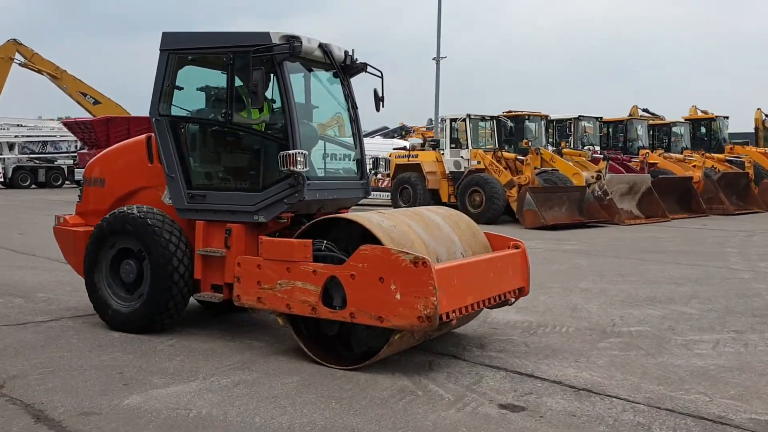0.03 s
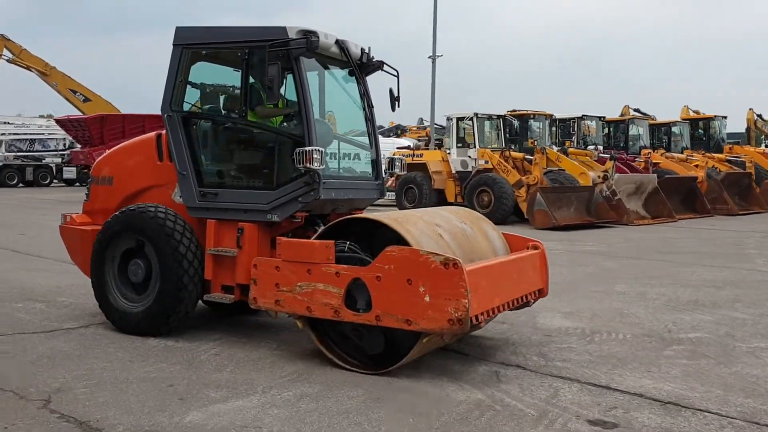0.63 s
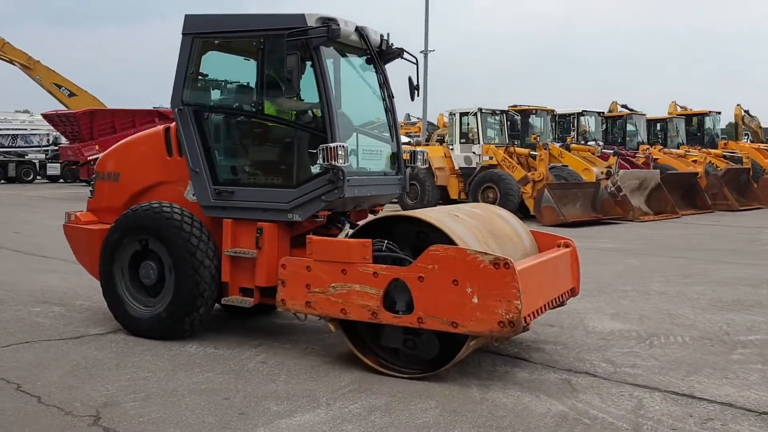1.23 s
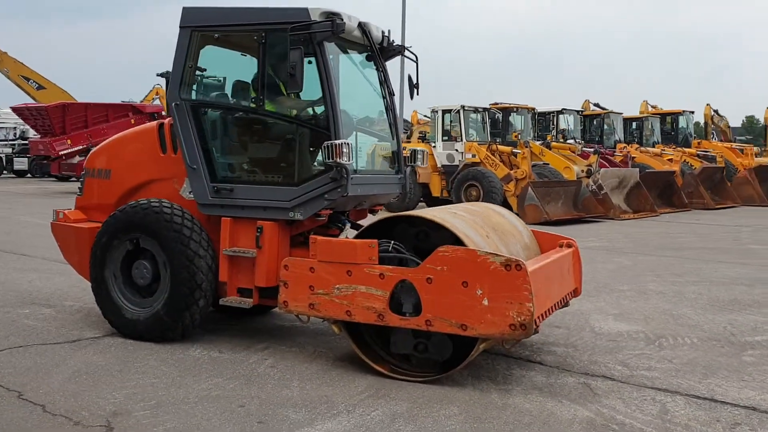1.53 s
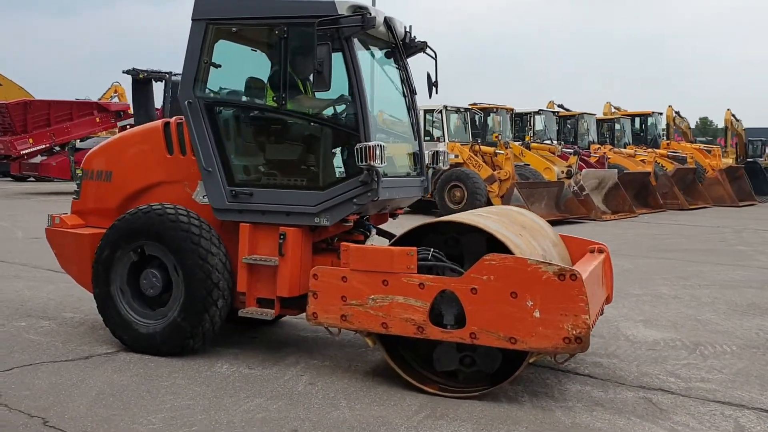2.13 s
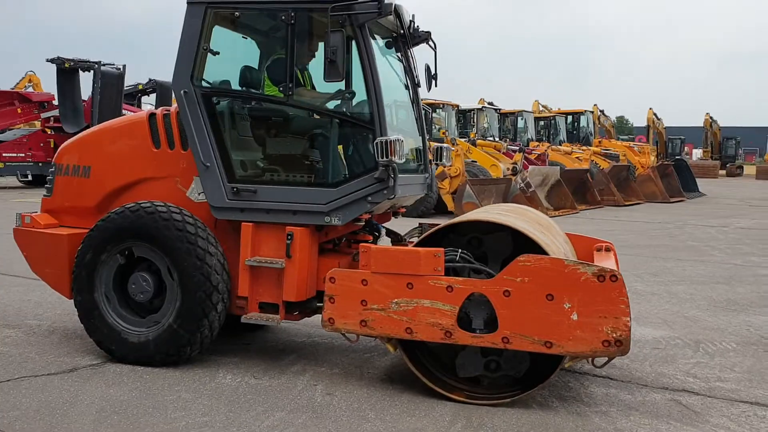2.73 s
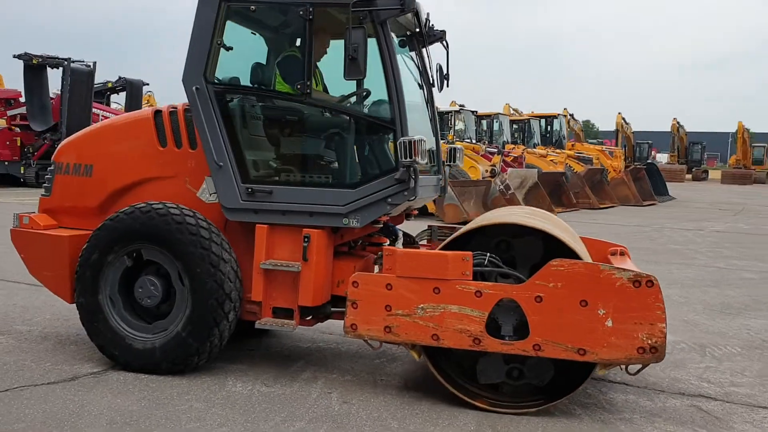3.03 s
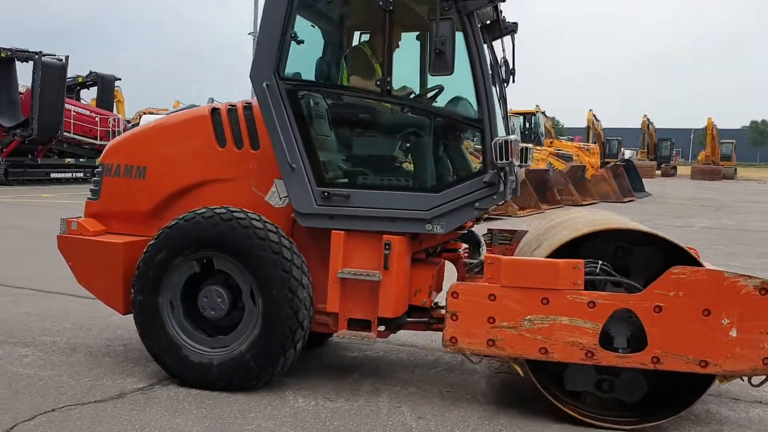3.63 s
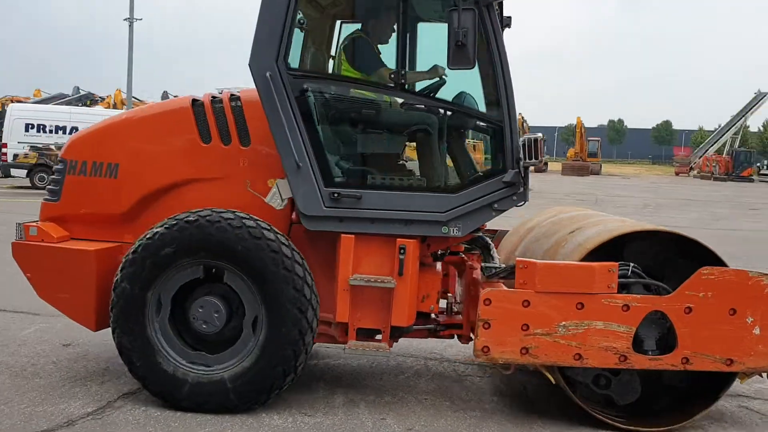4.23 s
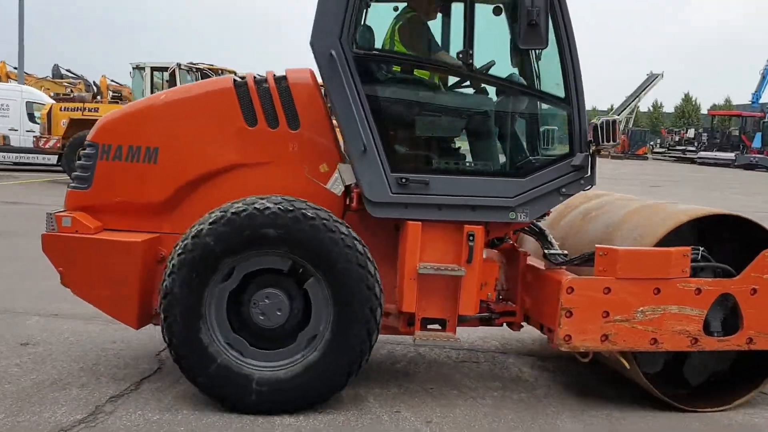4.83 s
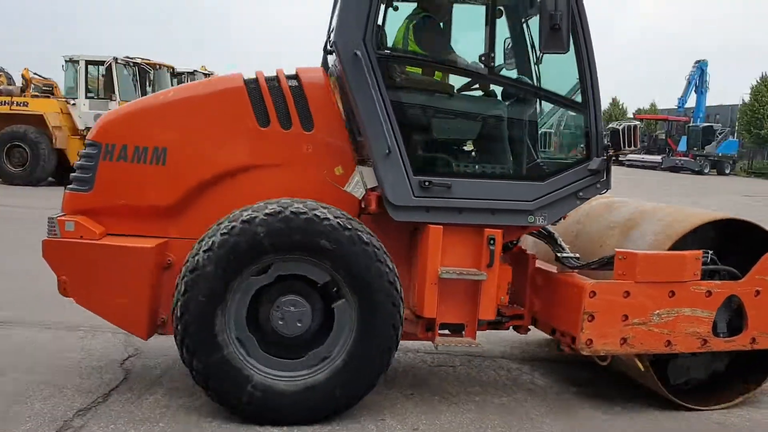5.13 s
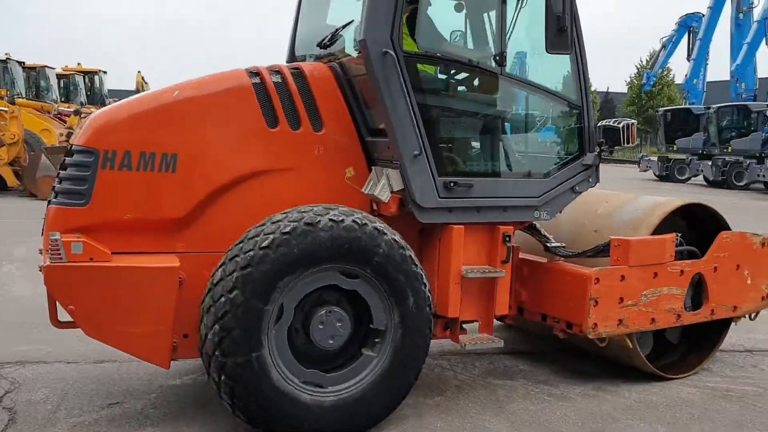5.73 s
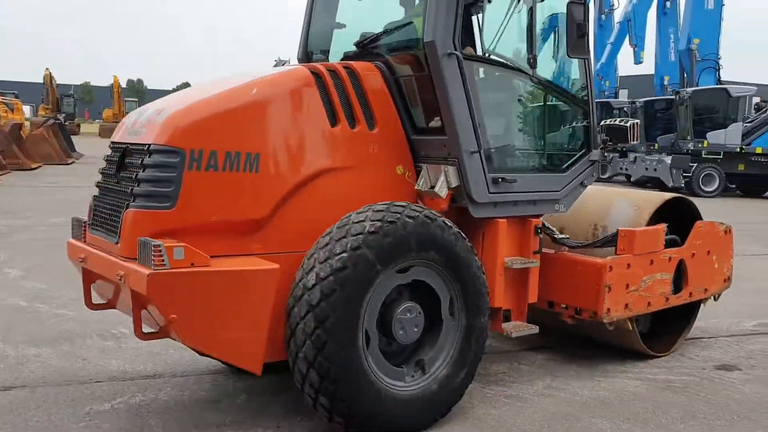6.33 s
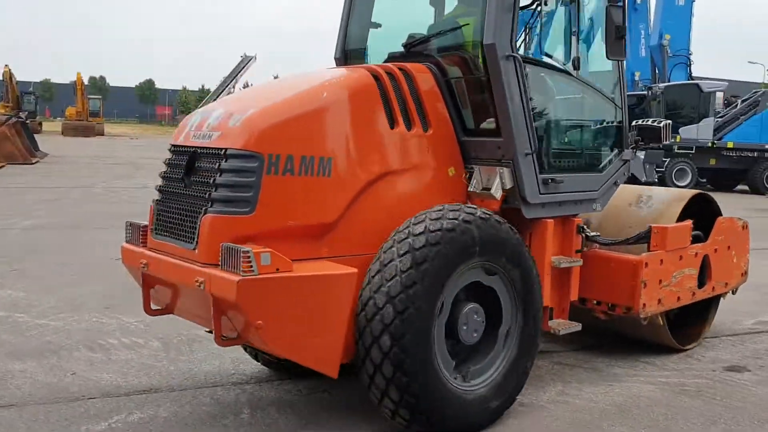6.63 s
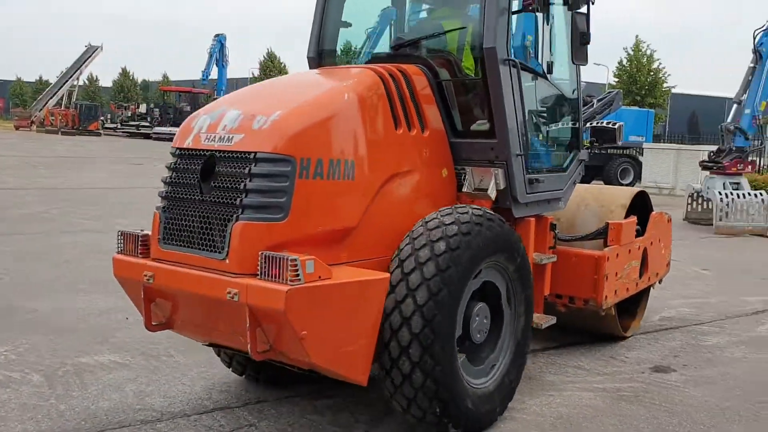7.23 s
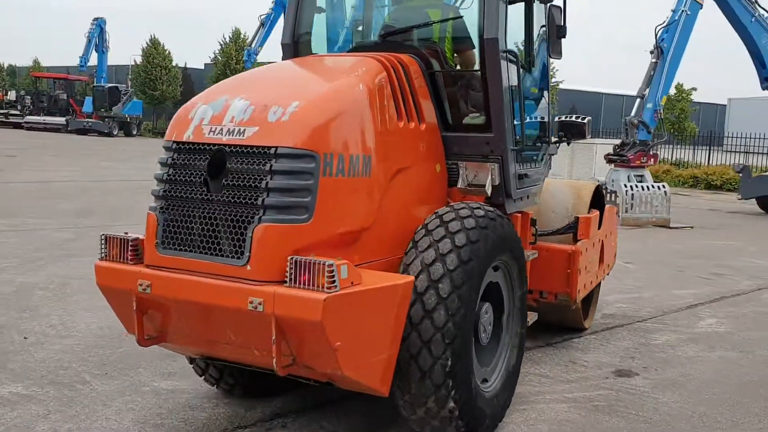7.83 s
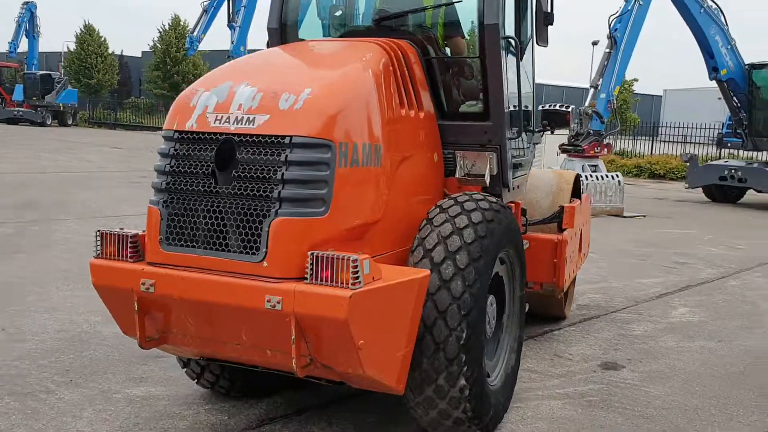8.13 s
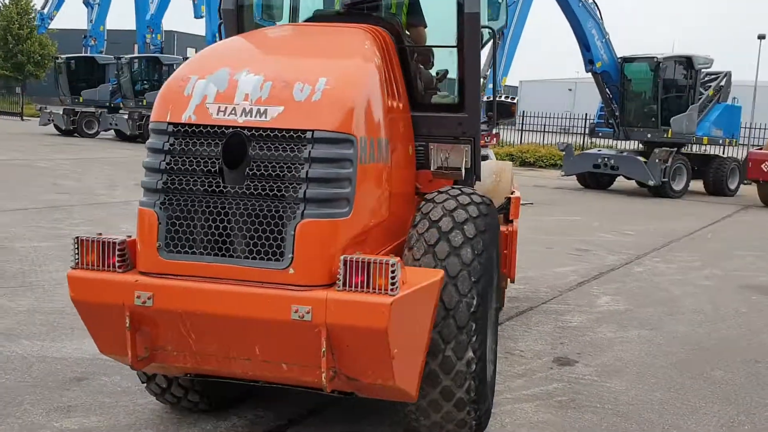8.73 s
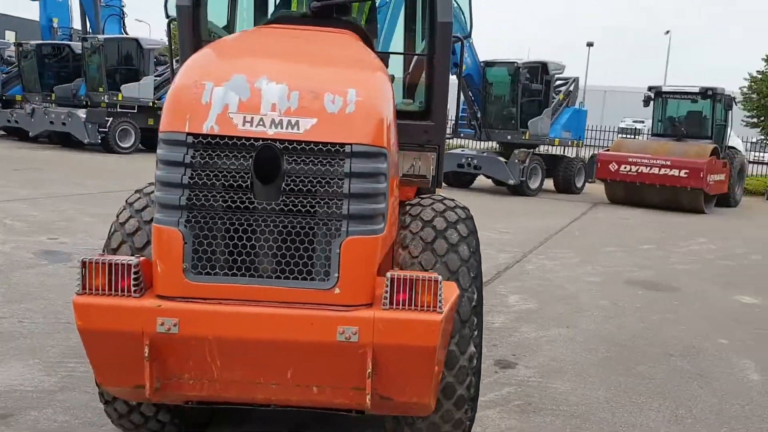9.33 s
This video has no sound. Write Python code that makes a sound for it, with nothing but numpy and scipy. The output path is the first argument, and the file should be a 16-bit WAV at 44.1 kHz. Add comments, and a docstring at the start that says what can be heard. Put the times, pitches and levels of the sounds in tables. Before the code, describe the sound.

A road roller's diesel engine idles outdoors with a low drone, a hollow knock and the light clink of a loose part. At first, grit grinds and squeaks under the steel drum. Midway, a few stones crunch, and the engine sags under load, then recovers. As the microphone walks from the side to the rear grille, the knocking, ticking and fan rush grow. Wind briefly buffets the microphone near the end.

```python
"""A low diesel drone is heard first, with grit grinding under a road roller's steel drum.
The four-cylinder engine idles at about 1000 rpm, sagging under load and recovering; its firings set
the exhaust's pitch and the rhythm of a hollow knock and of a loose part that clinks at the side.
Each source has its own directivity, so as the microphone walks from the side to the rear grille the
drone shifts and combustion knock and fan rush grow. Stones crunch, and gusts buffet the microphone."""
import sys
import numpy as np
from scipy.fft import rfft, irfft, next_fast_len
from scipy.io import wavfile
from scipy.ndimage import map_coordinates

SR = 44100
rng = np.random.default_rng(int(sys.argv[2]) if len(sys.argv) > 2 else 0)


def unload_wav(signal):
    """Save mono or channel-first audio to the path in sys.argv[1] as 16-bit WAV at rate SR, clipped to [-1, 1]."""
    wavfile.write(
        sys.argv[1],
        SR,
        np.round(np.clip(np.atleast_2d(signal).T, -1, 1) * 32767).astype(np.int16),
    )


N = 413216

# The walk. Each row: time in seconds, bearing in degrees from the front, nearness gain in dB.
WALK = [(0, 30, 2), (1.2, 61, 0), (3.3, 90, 1), (5.3, 114.5, 2.2), (6.1, 120.6, 3), (7.2, 123.6, 2.4),
        (7.8, 150.5, 1.5), (8.7, 162, 3), (9.37, 146, 1.5)]
GRILLE_DEG = (57.6, 176.6)  # the rear grille starts to open to the ear, and is fully open
# Engine speed. Each row: time in seconds, firings per second.
FIRING_RATE = [(0.0, 36.91), (0.2, 34.14), (0.6, 33.7), (1.0, 33.99), (1.4, 33.64), (2.3, 33.75),
               (3.0, 33.36), (3.8, 32.74), (4.2, 32.85), (4.5, 31.76), (4.8, 31.81), (5.6, 31.05),
               (6.25, 30.77), (6.5, 32.62), (6.8, 33.33), (7.17, 35.76), (7.48, 33.38), (9.37, 33.04)]
IDLE_HZ, LABOUR_HZ = 33.14, 31.59  # firing rates running free and fully loaded
# Knock strength. Each entry: relative level in dB of one cylinder, in firing order.
CYLINDERS = [5.9, 6.7, 0.64, 2.6]

# Noise spectra. Each row: frequency in Hz, relative spectral density in dB.
GRIT_SPECTRUM = [(2000, -27), (5000, -6), (7900, -1.5), (9500, -16.5), (12000, -8.5), (15700, -27)]
THUD_SPECTRUM = [(300, -15), (700, -1), (1400, 1), (2400, -1.5), (5000, -20), (10000, -38)]
GUST_SPECTRUM = [(20, -17), (60, 4.5), (130, -1.5), (250, -4.5), (450, -16.5), (800, -21), (2000, -59)]
VENT_SPECTRUM = [(150, -30), (250, 2.5), (340, -4.5), (450, -2), (570, -11), (720, 0), (930, -6),
                 (1300, -27), (2500, -43.5)]
BOOM_SPECTRUM = [(10, -7), (25, -1), (40, 3), (80, 5), (150, 2.5), (210, -2.5), (300, -6), (380, -12.5),
                 (600, -49)]
PANEL_SPECTRUM = [(200, -29.5), (350, -8), (480, -2), (570, -1), (680, -3), (800, -5.5), (1000, -7.5),
                  (1250, -11), (2000, -51)]
CLATTER_SPECTRUM = [(600, -34.5), (1000, -6.5), (1300, 0), (1700, 1), (2000, -4), (2500, -7), (3200, -20),
                    (5000, -32.5)]
RUSH_SPECTRUM = [(1800, -20), (2800, 6), (3500, 2), (4500, 2), (5200, -3), (6000, -5.5), (7500, -5),
                 (8600, -22.5), (10300, -17), (13500, -18.5), (15700, -39)]
FAN_SPECTRUM = [(150, -28.5), (230, -3.5), (300, -0.5), (370, -6.5), (460, -23.5), (800, -36)]

# Resonances. Each row: frequency in Hz, bandwidth in Hz, relative level in dB.
DRUM_MODES = [(520, 110, 4), (964, 46, 7), (1380, 160, -8.5), (1820, 220, -0.5), (2100, 130, 1),
              (2250, 70, -2), (2640, 19, -0.5), (4040, 140, -7.5), (5330, 120, -18), (7900, 3000, -25.5),
              (12800, 2600, -27.5)]
CRACK_MODES = [(2500, 1700, -7), (4600, 2400, 4.5), (9400, 900, 3), (11400, 1900, -1.5)]
SHELL_MODES = [(3020, 70, -5), (4060, 120, -3), (4780, 250, -5.5), (5430, 120, -5), (9200, 120, -13.5)]  # the drum after a stone bursts
SQUEAK_MODES = [(2390, 50, 3), (2600, 79, -2.5), (4030, 63, -14), (5080, 90, -3.5), (5480, 140, -12)]  # the drum as grit skids under it
FRAME_MODES = [(610, 64, 4.5), (678, 45, 10), (1300, 110, -6), (1470, 55, -9.5), (1740, 55, -5),
               (2140, 150, -6), (2960, 75, -14.5), (4430, 350, -19.5)]
INJECTOR_MODES = [(4080, 180, -4.5), (4500, 250, 1.5), (6970, 360, -7), (7850, 250, -9.5),
                  (10400, 220, -17), (11900, 1700, -19)]  # injectors and valve gear
ZING_MODES = [(6300, 92, 3), (6650, 250, -10), (7200, 270, -12)]  # a thin ring on top of the ticks
BLOCK_MODES = [(1315, 92, -2.5), (1496, 76, -0.5), (1573, 63, 0.5), (1764, 67, -3), (2205, 52, -5.5),
               (2695, 130, -14), (4220, 470, -16), (4425, 70, -12), (7400, 400, -26)]
COVER_MODES = [(2610, 36, 3.5), (2805, 130, 0), (3015, 25, 5), (3250, 16, 2), (3780, 240, -6),
               (4550, 29, 1.5), (6390, 95, -7.5), (7290, 76, -8), (7800, 160, -18.5), (9300, 30, -17),
               (10240, 120, -8)]

# Partials of struck parts. Each row: frequency in Hz, relative level in dB.
CLONK_PARTIALS = [(908, -2), (992, -14), (823, -9.5)]
CLINK_PARTIALS = [(1744, 2), (1508, -3.5)]
PING_PARTIALS = [(1512, -1), (1765, -15)]

# Bell-shaped swells. Each row: time of the peak in seconds, level in dB, half length in seconds.
GRIT_PATCHES = [(.3, -61.5, 0.6), (4.72, -66, 0.088), (4.95, -62, 0.056), (5.27, -59, .03)]
GUSTS = [(3.44, -40, 0.04), (6.007, -27, 0.043), (8.863, -25, 0.037), (8.986, -19, 0.02),
         (9.034, -20, 0.037)]
VENT_PASS = [(5.75, -43.5, 0.45)]
TICK_FLARES = [(5.08, -60, .1), (5.8, -57, .04), (5.97, -57.5, .03), (6.45, -60, .05), (6.58, -57, .035)]
ZING_SWELLS = [(6.58, -68, 0.23), (7.34, -60, .1), (8.5, -68, 0.51)]

# Levels along the walk. Each row: time in seconds, level in dB.
CLONK_LEVEL = [(0, -63), (1.95, -58), (2.1, -54), (3.2, -55), (3.8, -62), (6, -59.5), (9.37, -54.5)]
PING_LEVEL = [(0, -60.5), (3.3, -55), (5.75, -57), (6.05, -45.5), (6.5, -49.5), (7.3, -51.5), (7.8, -41.5),
              (8.25, -48.5), (8.7, -42.5), (9.37, -51)]
DRONE_LEVEL = [(0.0, -23.5), (0.26, -20), (1.06, -20), (1.58, -17.5), (4.82, -14.5), (6.35, -16.5),
               (6.63, -22), (6.94, -25.5), (8.03, -18), (8.68, -15.5), (8.96, -17), (9.01, -20.5),
               (9.3, -18.5)]

# Scraping grit. Each row: start in seconds, relative level in dB, T60 in seconds, centre in Hz,
# width in octaves.
SCUFFS = [(.07, -61, 0.2, 7700, .24), (.645, -56.5, 0.17, 7200, 0.45), (.72, -60, 0.12, 10500, .4),
          (0.774, -59.5, .3, 7750, .25), (1.124, -59, 0.3, 7450, 0.28), (2.735, -59.5, 0.2, 7460, .22),
          (3.66, -61.5, 0.31, 8130, .5), (3.81, -59.5, 0.23, 9600, .4), (3.935, -59, 0.5, 8000, .35)]
# Crushed stones. Each row: start in seconds, relative crack, thud and ring in dB, T60 in seconds.
STONES = [(4.065, -56.5, -66, -61, .2), (4.092, -44.5, -51, -48.5, .21), (4.275, -53, -41.5, -62, 0.28)]
# Skidding grit. Each row: start in seconds, relative level in dB, T60 in seconds.
SQUEAKS = [(.245, -53.5, 0.54), (.42, -56, 0.43)]
# The sharpest puffs of air. Each row: time in seconds, relative peak in dB.
THUMPS = [(8.9925, -11), (9.0517, -7)]
# Gear tones. Each row: multiple of the firing rate, level on the axis in dB, bearing and half width
# in degrees, level elsewhere in dB.
GEAR_TONES = [(19.5, -50.5, 73, 9, -66), (18.5, -53, 89, 8, -68), (18, -48.5, 113.5, 4.5, -65),
              (17.5, -47, 173, 14, -68)]
# Blows of the loose part. Each row: place in the four-stroke cycle in firings, relative level in dB.
STRIKES = [(3.2, -1), (1.1, 0)]
# The rattle's lobe. In order: level on the axis in dB, bearing and half width in degrees, dB elsewhere.
RATTLE_BEAM = (-50, 75.5, 7, -57.5)
# Machine noise. Each triple: relative level from the front, gain at the grille, gain under load, in dB.
BOOM_LEVEL, PANEL_LEVEL = (-42, 4.8, -3), (-45, 3.9, 0.65)
KNOCK_LEVEL, RUSH_LEVEL = (-49, 7, -.3), (-58.3, 8.2, -0.32)
# Exhaust harmonics. Each row: multiple of the firing rate, level in dB at each of the four QUARTERS_DEG,
# gain under load in dB.
EXHAUST_ORDERS = [(1, -47, -46, -49.5, -39, 2), (3, -41, -40, -31, -28.5, -5.5),
                  (4, -37, -31, -39.5, -38, -6.5), (5, -50.5, -38, -55, -52, -11),
                  (6, -53.5, -53.5, -53, -44, 13), (7, -51.5, -53, -59, -51, -6),
                  (8, -55, -57.5, -44.5, -36.5, 4), (10, -67, -65.5, -66, -50, 8.5)]
QUARTERS_DEG = (45, 90, 135, 180)

# Stereo coherence. Each row: frequency in Hz, correlation of left and right.
COHERENCE = [(30, .95), (70, .93), (130, .8), (300, .88), (640, .85), (1000, .76), (1400, .5), (3000, 0),
             (14000, 0)]
# Imbalance of the microphone's ports. Each row: frequency in Hz, left minus right in dB.
IMBALANCE = [(60, 0.45), (130, 0.5), (280, 0), (550, 0.5), (1200, -4), (2400, -2.5), (5000, -2), (9000, 1),
             (13000, -7.5)]
# The microphone's treble droop. Each row: frequency in Hz, gain in dB.
DROOP = [(13800, 0), (15700, -7.5)]


def amp(db):
    """Decibels to amplitude ratio."""
    return 10 ** (np.asarray(db) / 20)


def unit(x):
    """Normalisation to rms 1."""
    return x / np.sqrt(np.mean(x ** 2) + 1e-20)


def white():
    """Two uncorrelated white noises."""
    return rng.standard_normal((2, N))


def along(points, hz):
    """Interpolation of (Hz, value) points on a logarithmic frequency axis."""
    f, v = np.transpose(points)
    return np.interp(np.log(hz + 1), np.log(f + 1), v)


def curves(rows):
    """Linear interpolation in time: one value per sample for each column after the first."""
    s, *cols = np.transpose(rows)
    return [np.interp(np.arange(N) / SR, s, c) for c in cols]


def wobble(rate):
    """Random modulation: a smooth curve through rate knots a second."""
    knots = np.arange(N) * rate / SR
    steps = np.arange(0, knots[-1] + 1, .125)
    heights = rng.standard_normal(int(knots[-1]) + 4)
    return np.interp(knots, steps, map_coordinates(heights, [steps]))


def swells(rows):
    """Superposition of Gaussian envelopes."""
    t = np.arange(N) / SR
    return sum(amp(db) * np.exp(-.5 * ((t - s) / length) ** 2) for s, db, length in rows)


def impact(age, rise, decay):
    """Envelope of a damped vibration: quick rise, exponential decay."""
    return (1 - np.exp(-age / rise)) * np.exp(-age / decay)


def filtered(x, response):
    """Linear filtering: the spectrum times a frequency response."""
    m = next_fast_len(N + SR // 2)
    return irfft(rfft(x, m) * response(np.fft.rfftfreq(m, 1 / SR)), m)[..., :N]


def colour(points):
    """The frequency response of a (Hz, dB) spectrum."""
    return lambda hz: amp(along(points, hz))


def ringing(modes):
    """Modal superposition: the response of damped resonators of alternating sign."""
    return lambda hz: sum((-1) ** k * amp(db) * 1j * hz * width / (f0 * f0 - hz * hz + 1j * hz * width)
                          for k, (f0, width, db) in enumerate(modes))


def radiated(pair, response=np.ones_like):
    """Partial coherence: two signals become stereo, alike in the bass, unrelated above; mid at rms 1."""
    def spread(hz):
        turn = np.arccos(np.clip(along(COHERENCE, hz), -1, 1)) / 2
        return response(hz) * np.array([np.cos(turn), np.sin(turn)])
    mid, side = filtered(pair, spread)
    return np.array([mid + side, mid - side]) / np.std(mid)


def bearing():
    """The microphone's azimuth in degrees from the front of the machine."""
    return curves(WALK)[0]


def grille():
    """Line of sight: how far the rear grille is open to the microphone, 0-1."""
    return .5 - .5 * np.cos(np.pi * np.interp(bearing(), GRILLE_DEG, (0, 1)))


def beam(axis_db, centre_deg, width_deg, elsewhere_db):
    """Directivity: the level in dB as the microphone crosses a radiation lobe."""
    lobe = np.exp(-.5 * ((bearing() - centre_deg) / width_deg) ** 2)
    return elsewhere_db + (axis_db - elsewhere_db) * lobe


def load():
    """Speed droop gives the load, 0-1: the harder the engine works, the slower it turns."""
    return np.clip((IDLE_HZ - curves(FIRING_RATE)[0]) / (IDLE_HZ - LABOUR_HZ), 0, 1)


def vibration(firings, locked):
    """Cyclic excitation: parts strike in order, so a locked share of the noise power repeats each cycle."""
    size = int(4 * N / firings[-1])
    cycle = rng.standard_normal((2, size))
    place = (firings / 4 % 1 * size).astype(int)
    return np.sqrt(locked) * cycle[:, place] + np.sqrt(1 - locked) * white()


def blows(firings, rise, decay, scatter_db):
    """Impulsive excitation at rms 1, each cylinder with its own strength; times in firing periods."""
    index, age = firings.astype(int), firings % 1
    count = index[-1] + 1
    strength = amp(np.resize(CYLINDERS, count) + scatter_db * rng.standard_normal(count))
    return unit(strength[index] * impact(age, rise, decay))


def struck(count, partials, detune):
    """Free vibration: each whole step of count restarts the partials, slightly off pitch."""
    index = (count - np.floor(count[0])).astype(int)
    out = 0
    for hz, db in partials:
        start = rng.uniform(0, 2 * np.pi, (2, index[-1] + 1))
        pitch_hz = hz * (1 + detune * rng.standard_normal(index[-1] + 1))
        out = out + amp(db) * np.sin(2 * np.pi * np.cumsum(pitch_hz[index]) / SR + start[:, index])
    return out


def overtone(angle, level_db, waver):
    """One harmonic, wavering in level and phase; reflections make it drift between left and right."""
    drift = np.array([[1], [-1]]) * waver * 0.051 * wobble(7.8)
    phase = 0.16 * waver * wobble(18)
    return np.sqrt(2) * amp(level_db + waver * wobble(14)) * np.sin(angle + phase + drift)


def scrape(s, db, t60, response, rise_s=0.0097):
    """A transient of grainy, filtered noise that decays by 60 dB in t60 seconds."""
    out, t = np.zeros((2, N + SR)), np.arange(SR // 2) / SR
    noise = rng.standard_normal((2, len(t)))
    grains = noise * amp(1.4 * np.repeat(rng.standard_normal(len(t)), 64)[:len(t)])
    burst = unit(irfft(rfft(grains) * response(np.fft.rfftfreq(len(t), 1 / SR)), len(t)))
    envelope = amp(db + 8 - 60 * t / t60) * (1 - np.exp(-t / rise_s))
    out[:, round(s * SR):][:, :len(t)] = envelope * burst
    return out[:, :N]


def drum():
    """Rolling noise: grit excites the steel shell's modes, fading as the drum slows to a creep."""
    grind, creep = swells([(0.0066, -45, 0.54)]), amp(-77)
    return (grind + creep) * radiated(white() * amp(0.83 * wobble(250)), ringing(DRUM_MODES))


def grit():
    """Friction: grit scrapes on concrete and squeaks under the shell, and fine patches crackle."""
    def band(centre_hz, octaves):
        return lambda hz: np.exp(-.5 * (np.log2((hz + 1) / centre_hz) / octaves) ** 2)
    scuffs = sum(scrape(s, db, t60, band(*shape)) for s, db, t60, *shape in SCUFFS)
    squeaks = sum(scrape(s, db, t60, ringing(SQUEAK_MODES)) for s, db, t60 in SQUEAKS)
    crackle = radiated(white() * amp(4.5 * wobble(22) + 2.3 * wobble(300)), colour(GRIT_SPECTRUM))
    return scuffs + squeaks + swells(GRIT_PATCHES) * crackle


def stones():
    """Brittle fracture: a stone bursts with a crack and a thud, and the shell rings on."""
    return sum(scrape(s, crack_db, t60, ringing(CRACK_MODES), rise_s=0.0025)
               + scrape(s, thud_db, t60, colour(THUD_SPECTRUM), rise_s=.004)
               + scrape(s, ring_db, t60=0.59, response=ringing(SHELL_MODES))
               for s, crack_db, thud_db, ring_db, t60 in STONES)


def gusts(half_length_s=0.0012):
    """Turbulent pressure buffets the microphone, harder on the left; sharp puffs hit as single pulses."""
    pulses = 0
    for s, db in THUMPS:
        offset = (np.arange(N) / SR - s) / half_length_s
        pulses = pulses + amp(db) * (1 - offset ** 2 / 2) * np.exp(-.5 * offset ** 2)
    buffet = swells(GUSTS) * unit(filtered(white(), colour(GUST_SPECTRUM)))
    return amp([[2.5], [-2]]) * (buffet + pulses)


def vents(firings):
    """Flow noise from the hood's side vents swells as the microphone passes them."""
    return swells(VENT_PASS) * radiated(vibration(firings, locked=0.16), colour(VENT_SPECTRUM))


def gears(firings):
    """Aperture radiation: each fluttering tone of gears and hydraulic pump beams from a gap in the hood."""
    turn = 2 * np.pi * firings
    return sum(overtone(k * turn + .2 * wobble(60), beam(*lobe) + 2 * wobble(50), waver=2.6)
               for k, *lobe in GEAR_TONES)


def clonk(firings):
    """Damped resonance: one knock in each four-stroke cycle leaves a short, hollow ring."""
    cycles = (firings - 3.05) / 4
    blow = impact(cycles % 1 * 4, rise=.35, decay=.21) * amp(0.91 * wobble(8))
    return amp(curves(CLONK_LEVEL)[0]) * radiated(struck(cycles, CLONK_PARTIALS, detune=.012) * blow)


def rattle(firings):
    """Impact noise: a loose part hits the frame about once per crankshaft turn, and both ring."""
    shake = sum(amp(db) * impact((firings - at) % 4, rise=.12, decay=.28) for at, db in STRIKES)
    drive = vibration(firings, locked=.5) * np.sqrt(.5 + unit(shake) ** 2)
    frame = radiated(drive, ringing(FRAME_MODES))
    turns = (firings - STRIKES[1][0]) / 2
    clink = radiated(struck(turns, CLINK_PARTIALS, detune=0.0118) * shake)
    return amp(beam(*RATTLE_BEAM)) * (frame + amp(-5) * clink)


def injectors(firings):
    """Impulses excite high modes: the injectors tick just ahead of each firing, unevenly and in flares."""
    clicks = blows(firings + 0.044, rise=.08, decay=.24, scatter_db=1.5)
    tick_gain = amp(-55.2 + 1.8 * wobble(8.6)) * grille() ** 1.8 + swells(TICK_FLARES)
    ticks = radiated(vibration(firings, locked=.13) * clicks, ringing(INJECTOR_MODES))
    zing = radiated(vibration(firings, locked=.13) * clicks, ringing(ZING_MODES))
    return tick_gain * ticks + swells(ZING_SWELLS) * zing


def block_ping(firings):
    """Shock excitation: each firing sets the block ringing with a metallic ping."""
    pings = blows(firings - .03, rise=.3, decay=.24, scatter_db=.8)
    return amp(curves(PING_LEVEL)[0]) * radiated(struck(firings, PING_PARTIALS, detune=0.01207) * pings)


def fan():
    """Aerodynamic noise: the fan's low roar escapes through the rear grille."""
    return amp(-41.5) * grille() * radiated(white(), colour(FAN_SPECTRUM))


def engine_body(firings):
    """Forced vibration: hood and panels boom, block and covers knock, and the fan's rush fills the gaps."""
    rear, effort, near_db = grille(), load(), curves(WALK)[1]
    boom_db, panel_db, knock_db, rush_db = (
        front_db + near_db + grille_db * rear + load_db * effort
        for front_db, grille_db, load_db in (BOOM_LEVEL, PANEL_LEVEL, KNOCK_LEVEL, RUSH_LEVEL))
    hits = blows(firings, rise=.16, decay=.34, scatter_db=.7)
    taps = blows(firings, rise=.12, decay=.18, scatter_db=1)

    def pulsing(share):
        """Amplitude modulation that puts a share of the power in the firings."""
        return np.sqrt(1 - share + share * hits ** 2)

    def part(db, response, envelope, locked):
        """Source and filter: modulated vibration through one part's response."""
        return amp(db) * radiated(vibration(firings, locked) * envelope, response)

    boom = part(boom_db + 4.5, colour(BOOM_SPECTRUM), envelope=1, locked=0.3)
    panels = part(panel_db - 2.5, colour(PANEL_SPECTRUM), pulsing(0.24), locked=0.25)
    clatter = part(knock_db - 2.5 - 1.4 * rear, colour(CLATTER_SPECTRUM), pulsing(0.22), locked=0.36)
    knock = part(knock_db - 9 + 4 * rear, ringing(BLOCK_MODES), hits, locked=0.16)
    rush = part(rush_db + 0.34 - 4 * rear, colour(RUSH_SPECTRUM), pulsing(0.19), locked=0.11)
    covers = rear ** 2.3 * part(knock_db - 9.5, ringing(COVER_MODES), taps, locked=0.16)
    return boom + panels + clatter + knock + rush + covers


def exhaust(firings):
    """Periodic puffs form a harmonic series, led by a drone at twice the firing rate."""
    turn, azimuth, effort = 2 * np.pi * firings + np.pi / 4, bearing(), load()
    drone_gain = np.sqrt(2) * amp(curves(DRONE_LEVEL)[0] + 0.26 * wobble(22))
    drift = np.array([[1], [-1]]) * 0.06 * wobble(1.98)
    out = drone_gain * np.sin(2 * turn + drift)
    for k, *quarters_db, load_db in EXHAUST_ORDERS:
        level_db = np.interp(azimuth, QUARTERS_DEG, quarters_db) + load_db * effort
        out = out + overtone(k * turn, level_db, waver=.4 + 0.23 * k)
    return out


def scene():
    """Superposition of all sources; one running count of firings keeps the engine's parts in step."""
    firing_hz = curves(FIRING_RATE)[0] * (1 + .001 * wobble(12))
    firings = .75 + np.cumsum(firing_hz) / SR
    background = drum() + grit() + stones() + gusts() + vents(firings) + gears(firings)
    impacts = clonk(firings) + rattle(firings) + injectors(firings) + block_ping(firings)
    return background + impacts + fan() + engine_body(firings) + exhaust(firings)


def record(dry):
    """Level and time differences: two band-limited ports differ in colour, and the left hears first."""
    ports, lead_s, top_hz = np.array([[.5], [-.5]]), .00015, 15700

    def response(hz):
        gain = amp(ports * along(IMBALANCE, hz) + along(DROOP, hz))
        return gain * np.exp(2j * np.pi * hz * ports * lead_s) * (hz < top_hz)
    return filtered(dry, response)


dry = scene()
out = record(dry)
unload_wav(out)
```